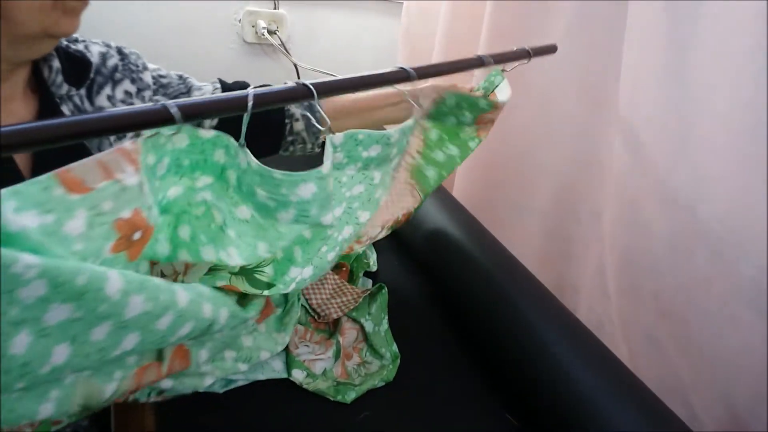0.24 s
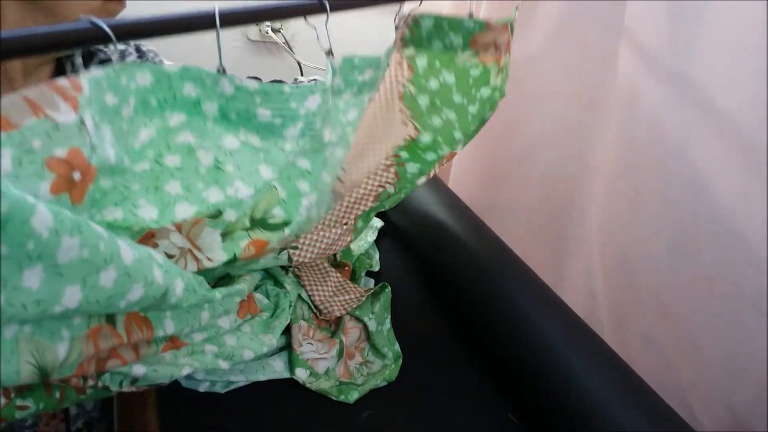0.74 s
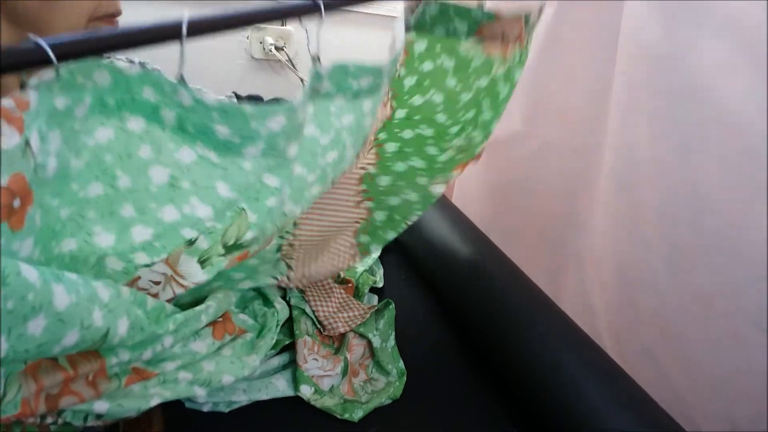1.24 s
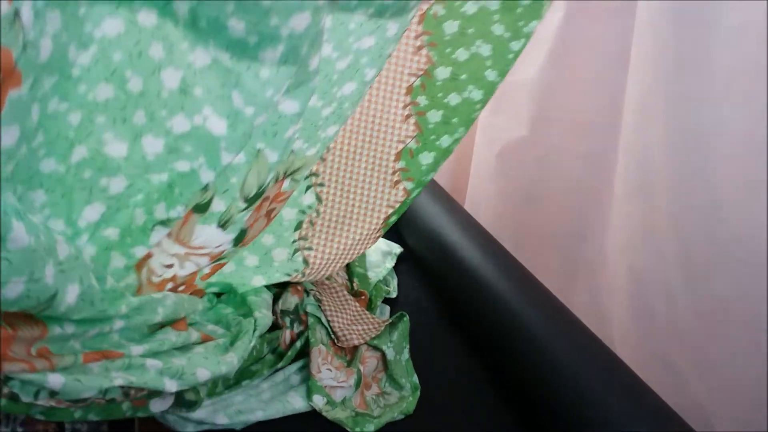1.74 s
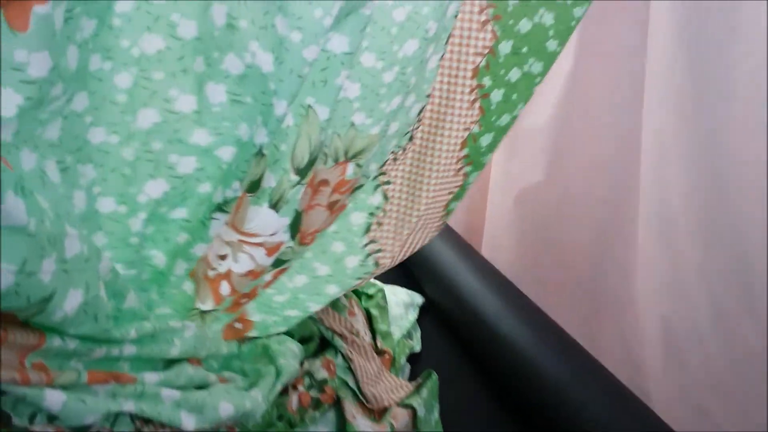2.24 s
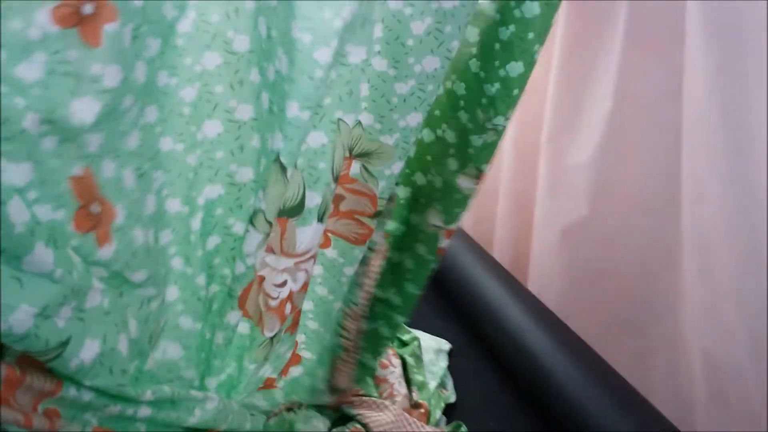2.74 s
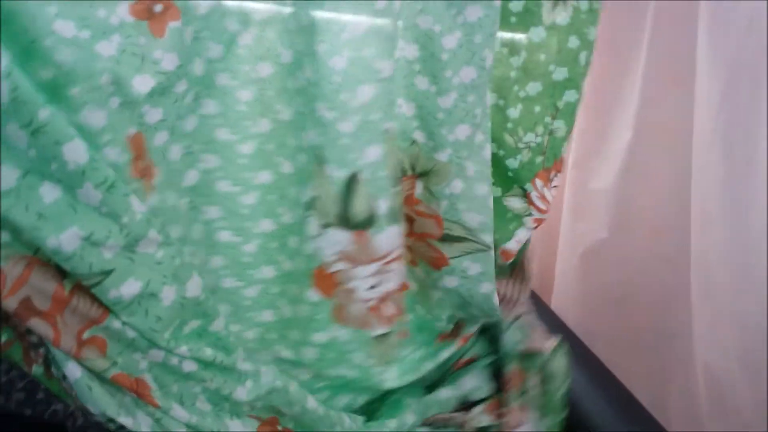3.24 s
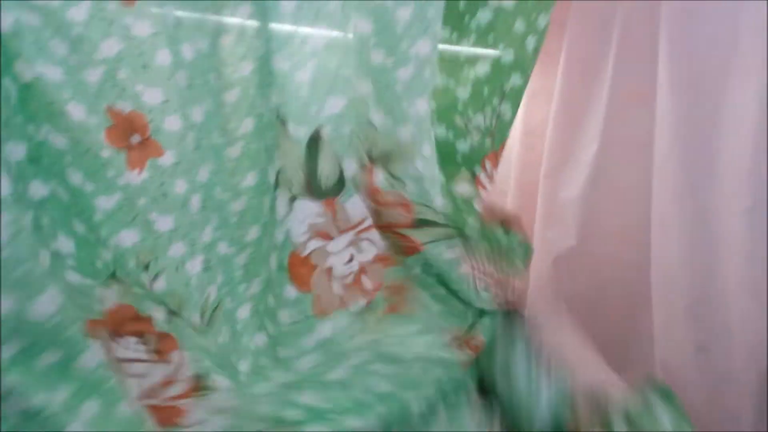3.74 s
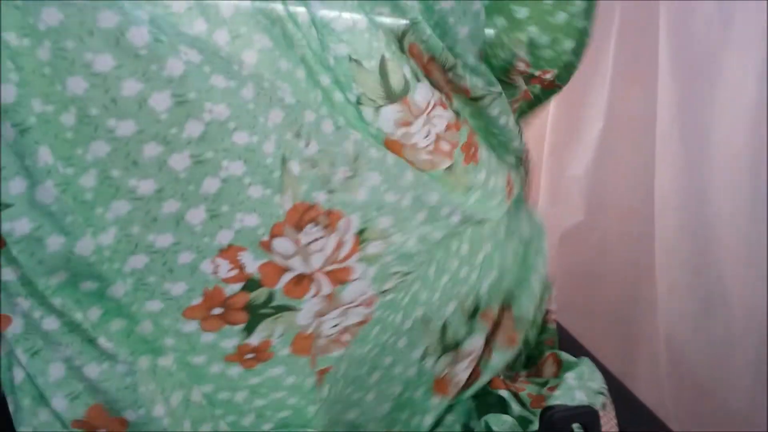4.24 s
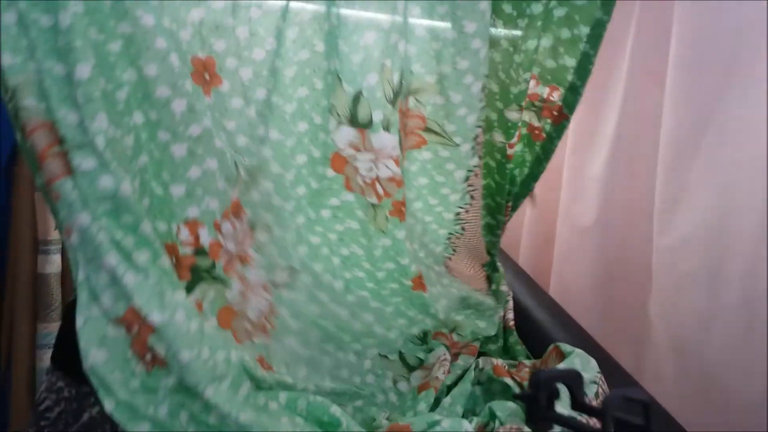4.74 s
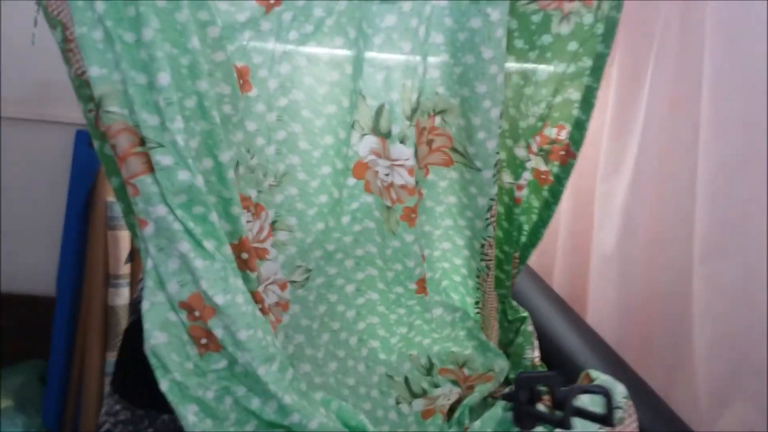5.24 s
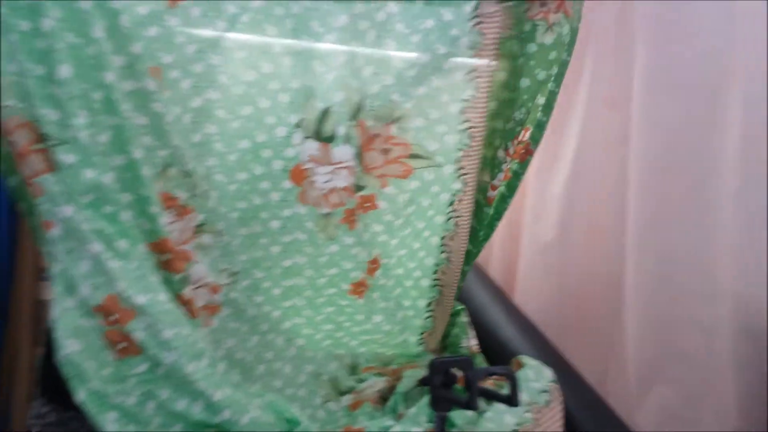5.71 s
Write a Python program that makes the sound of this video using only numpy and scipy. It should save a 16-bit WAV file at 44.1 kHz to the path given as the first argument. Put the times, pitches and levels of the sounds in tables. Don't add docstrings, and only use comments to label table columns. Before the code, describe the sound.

Small metal hooks scrape and clink sharply along a thin hollow rod, then cloth swishes and snaps softly over a faint room hum.

```python
import sys
import numpy as np
from scipy import signal
from scipy.fft import rfft, irfft, next_fast_len
from scipy.io import wavfile

SR = 44100
rng = np.random.default_rng(int(sys.argv[2]) if len(sys.argv) > 2 else 0)


def voltage_ratio(decibels):
    exponent = np.asarray(decibels, float) / 20
    return 10 ** exponent


def unload_wav(signal):
    wavfile.write(
        sys.argv[1],
        SR,
        np.round(np.clip(np.atleast_2d(signal).T, -1, 1) * 32767).astype(np.int16),
    )


N = 263532
T = np.arange(N) / SR
BLOW, TAIL = T[:6000], T[:12000]
FAMILIES = 4


def unit_rms(x):
    return x / np.sqrt(np.mean(x ** 2) + 1e-20)


def colour(x, points, power=1):
    f, db = np.transpose(points)
    size = next_fast_len(len(x), True)
    hz = np.fft.rfftfreq(size, 1 / SR)
    gain_db = power * np.interp(np.log(hz + 1), np.log(f + 1), db)
    return irfft(rfft(x, size) * voltage_ratio(gain_db), size)[:len(x)]


def band(x, lo_hz, hi_hz):
    return signal.sosfilt(signal.butter(3, [lo_hz, hi_hz], "band", fs=SR, output="sos"), x)


def ring(x, hz, width_hz):
    return signal.lfilter(*signal.iirpeak(hz, hz / width_hz, SR), x)


def wander(per_s):
    steps = rng.standard_normal(500)
    return np.interp(T * per_s, np.arange(len(steps)), steps) * np.sqrt(3 / 2)


def add(mix, start_s, sound):
    part = mix[..., round(start_s * SR):][..., :sound.shape[-1]]
    part += sound[..., :part.shape[-1]]


def follow(rows):
    s, db, tint_db = np.transpose(rows)
    t = np.arange(s[0], s[-1], 1 / SR)
    fade = np.clip(np.minimum(t - s[0], s[-1] - t) / 0.011, 0, 1)
    return t, np.interp(t, s, db), fade, np.interp(t, s, tint_db)


def slips(per_s, spread_db):
    size = voltage_ratio(spread_db * np.minimum(rng.exponential(1, N), 4)) * rng.choice([-1., 1.], N)
    return unit_rms(size * (rng.random(N) < per_s / SR))


def tone(rows):
    s, hz, db = np.transpose(rows)
    fade = np.clip(np.minimum(T - s[0], s[-1] - T) / 0.01, 0, 1)
    phase = 2 * np.pi * np.cumsum(np.interp(T, s, hz)) / SR
    return np.sqrt(2) * voltage_ratio(np.interp(T, s, db)) * fade * np.sin(phase)


def echoes(t60, after_s):
    tail = rng.standard_normal(len(TAIL)) * voltage_ratio(-60 * TAIL / t60) * (TAIL > after_s)
    return tail / np.linalg.norm(tail)


def rod(drag):
    # pitch_hz, width_hz, level_db
    modes = [
        [(2445, 40, -11), (2750, 50, -7), (2860, 45, -5), (3220, 45, 0), (3315, 35, 1), (3415, 25, 1),
         (3900, 70, -14), (9006, 16, -5), (9056, 22, -5)],
        [(1370, 50, -7), (1610, 130, -5), (2010, 80, -7), (2170, 90, -9)],
        [(4428, 45, -8), (5090, 70, -10), (5430, 160, -6), (5950, 70, -6), (6275, 70, -3), (6920, 90, -5),
         (7560, 45, -6)],
        [(9250, 250, -8), (10300, 150, -13), (10650, 150, -13), (11900, 200, -14), (12900, 300, -12)],
    ]
    # low_hz, high_hz
    spans = [
        (2400, 4000),
        (1000, 2400),
        (4000, 8400),
        (8400, 15000),
    ]
    scratches = [
        -1,
        -1,
        0.5,
        7.5,
    ]
    contact, rasp = slips(4500, 3.7), slips(12000, 2.3)
    efforts = drag * voltage_ratio(-2.5 + 1.75 * wander(60)) + blows()
    out = np.zeros(N)
    for effort, rings, (lo_hz, hi_hz), scratch_db in zip(efforts, modes, spans, scratches):
        sound, power = np.zeros(N), 0
        for hz, width_hz, db in rings:
            sound += voltage_ratio(db) * ring(contact * effort * voltage_ratio(2.7 * wander(27)), hz, width_hz)
            power += voltage_ratio(2 * db) * np.pi * width_hz / SR
        scratch = band(rasp * effort, lo_hz, hi_hz) / np.sqrt(2 * (hi_hz - lo_hz) / SR)
        both = sound / np.sqrt(power) + voltage_ratio(scratch_db) * scratch
        out += both / np.sqrt(1 + voltage_ratio(2 * scratch_db))
    return out


def drags():
    # time_s, drag_db, contact_brightness_db
    slides = [
        [(.05, -63, -29), (.15, -54.5, 4), (.22, -53.5, 1), (.29, -48, 2.5), (.38, -54.5, -1.5),
         (.47, -46.5, -1.5), (.55, -49.5, -0.5), (.61, -59.5, -2), (.9, -93, -7)],
        [(1.27, -77, 0), (1.33, -68.5, -3.5), (1.465, -65.5, -1), (1.6, -80.5, 4.5)],
        [(2.38, -86, 6), (2.444, -57.5, -0.5), (2.55, -52.5, -1.5), (2.64, -51.5, 3), (2.77, -47.5, -2),
         (2.89, -55.5, -3), (2.96, -52.5, -3), (3.08, -69, -17), (3.34, -68, 2)],
        [(3.9, -63, 0), (3.96, -64.5, -6), (4.08, -59, -4), (4.14, -77, 2), (4.2, -66, 3)],
        [(4.39, -63, -6), (4.458, -60, -5), (4.525, -78, 11), (4.592, -58.5, -11), (4.66, -70, -13)],
        [(5.452, -56, -3), (5.51, -54, -2.5), (5.575, -47, -1), (5.645, -49.5, -2), (5.7, -58, -4.5),
         (5.9, -62.5, -3.5), (5.98, -64, -5.5)],
    ]
    # slide_start_db, slide_end_db
    loads = [
        (-1, -7),
        (-7, -2),
        (3, -10.5),
        (-5.5, 1),
        (-7, 1),
        (-5.5, -8),
    ]
    out = np.zeros((FAMILIES, N))
    top_db = -1.5
    offset_db = np.array([[0], [0], [0], [top_db]])
    low_per_drag_db, usual_drag_db = -0.27, -55.5
    for (t, db, fade, bright_db), load_db in zip(map(follow, slides), loads):
        weight_db = np.interp(t, t[[0, -1]], load_db) + low_per_drag_db * (db - usual_drag_db)
        add(out, t[0], fade * voltage_ratio(db + offset_db) * families(weight_db, bright_db))
    return out


def blows():
    # start_s, peak_db, weight_db, brightness_db, t60_s
    clinks = [(.117, -58, -6, 8, .025), (0.1252, -32.5, -8.5, 3.5, 0.044), (0.1734, -42, -14, 0.5, 0.13),
              (.2907, -54, 10, -12, 0.076), (.3242, -41.5, -14, -3.5, 0.11),
              (0.4546, -34.5, -24, 7.5, 0.018), (0.601, -54, -17, 3.5, 0.041),
              (0.7639, -36.5, -11, -6.5, 0.039), (0.7818, -48.5, -26, 1.5, .028),
              (1.166, -53.5, 3.5, 5.5, 0.049), (1.3035, -55.5, -6, -8, .04), (1.989, -44, -14, -3, 0.062),
              (2.9322, -50, -4, 8.5, .037), (2.9411, -45.5, -9, 3.5, 0.059), (3.2288, -45.5, -4, -4, 0.044),
              (3.9161, -44.5, -9, 4, 0.026), (4.106, -54, -17, 1, .045), (4.4628, -42, -14, 0, 0.03),
              (5.461, -53, 1, 7, 0.026), (5.5237, -46.5, -22, 1.5, .04), (5.5864, -51, 0, 0, 0.057),
              (5.6155, -44, -14, 2, 0.06), (5.7498, -57, -15, -2, 0.021), (5.837, -51, -19, 7.5, 0.029)]
    push = np.zeros((FAMILIES, N))
    for s, db, weight_db, bright_db, t60 in clinks:
        tick = voltage_ratio(-9 - 60 * BLOW / 0.0042)
        rattle = voltage_ratio(-60 * BLOW / t60)
        shudder = voltage_ratio(-18.0 - 60 * BLOW / (2.65 * t60))
        rise = np.minimum(BLOW / 0.00055, 1)
        gains = voltage_ratio(db - 6.0) * families(weight_db, bright_db)[:, None]
        add(push, s, gains * (tick + rattle + shudder) * rise)
    return push


def families(weight_db, bright_db):
    high_db = 1.1 * bright_db
    top_db = 1.58 * bright_db + 2.43
    return voltage_ratio(np.array([0 * bright_db, weight_db, high_db, top_db]))


def pings():
    # start_s, peak_db, pitch_hz
    ticks = [
        (.1262, -25, 7200),
        (.4545, -21, 6280),
        (.7648, -44, 3000),
        (1.1664, -38, 10300),
        (1.9892, -40, 5000),
        (5.4612, -45, 9080),
        (5.8365, -35, 6900),
    ]
    # start_s, peak_db, pitch_hz
    glints = [
        (.1268, -19.5, 13050),
        (.1268, -26, 10940),
        (.4555, -32, 10600),
        (.601, -42.5, 5570),
        (1.166, -42.5, 7100),
        (2.933, -36, 9900),
        (4.108, -46.5, 5880),
        (5.617, -37, 7570),
        (5.837, -41.5, 7440),
        (5.837, -46, 12700),
    ]
    # start_s, peak_db, pitch_hz
    ringing = [(.128, -38, 1997), (.128, -38, 7500), (.128, -46, 1620), (.293, -40, 2860),
               (.293, -43, 6310), (.296, -43, 1590), (.327, -35, 2875), (.456, -41, 2860),
               (.765, -46, 2890), (1.168, -56, 2870), (1.991, -56, 2400), (1.993, -56, 4890),
               (3.92, -52, 3400), (4.108, -58, 3420), (4.466, -52, 3320), (5.463, -47.5, 3320),
               (5.838, -50, 6320), (5.85, -49.5, 3260)]
    # start_s, peak_db, pitch_hz
    lingers = [(.078, -54.5, 3420), (.135, -39.5, 3320), (.455, -43, 9050), (.456, -36, 7560),
               (.766, -66, 3330), (1.993, -61, 3410), (2.46, -51, 1600), (2.482, -51, 1371),
               (2.945, -57, 3210), (3.232, -62, 3400), (4.465, -62, 9230), (4.905, -62, 3420),
               (5.48, -56, 9000), (5.527, -50, 3400), (5.57, -47, 8950), (5.587, -46, 3305),
               (5.62, -41, 3220), (5.68, -55, 3340), (5.752, -58, 3200), (5.8, -61, 3410), (5.9, -56, 3266)]
    out = np.zeros(N)
    rise = np.minimum(TAIL / 0.00078, 1)
    for rows, t60 in [(ticks, 0.0074), (glints, 0.027), (ringing, 0.086), (lingers, 0.16)]:
        for s, db, hz in rows:
            add(out, s, voltage_ratio(db - 60 * TAIL / t60) * rise * np.sin(2 * np.pi * hz * TAIL))
    return out


def squeak():
    # time_s, pitch_hz, level_db
    path = [
        (0.98, 10060, -94),
        (0.998, 10181, -81),
        (1.068, 10340, -79),
        (1.132, 10169, -87),
        (1.144, 10100, -76),
        (1.16, 10300, -81),
    ]
    return tone(path)


def snaps():
    # start_s, peak_db, pitch_hz, decay_cycles
    pops = [
        (1.5202, -35.5, 2760, 1.1),
        (3.619, -38.5, 788, 1.6),
        (3.835, -45.5, 650, 4.3),
        (3.849, -57, 484, 2.7),
        (4.254, -42, 2030, 4.8),
        (4.264, -48, 1320, 5.8),
        (4.2748, -38, 1540, 3),
        (4.589, -40, 855, 1.6),
        (4.607, -38, 1530, 1.7),
    ]
    out = np.zeros(N)
    for s, db, hz, cycles in pops:
        add(out, s, -voltage_ratio(db + 2.5) * np.sin(2 * np.pi * hz * BLOW) * np.exp(-2 * BLOW * hz / cycles))
    return out


def cloth(drag):
    # time_s, effort_db, crispness_db
    handling = [(.8, -66, 0), (1.04, -71.5, -6), (1.22, -69.5, -4), (1.55, -68.5, -3), (1.9, -77.5, 7),
                (2.25, -74, -7), (2.4, -72, -5), (3.0, -65, 4), (3.1, -62.5, -2), (3.46, -61, -1),
                (3.56, -67.5, 0.5), (3.64, -64, -11), (3.79, -62.5, -4), (4.1, -61, -3), (4.5, -61.5, -2.5),
                (4.75, -68, -5.5), (5.07, -68, -2), (5.2, -72, -17)]
    # middle_s, length_s, level_db, crispness_db
    swishes = [
        (2.016, 0.47, -68, 0.5),
        (3.927, 0.27, -58, 0),
        (4.26, 0.2, -53.5, -10),
        (4.614, 0.21, -58, -0.5),
        (4.899, 0.18, -62, 5.5),
        (5.35, 0.26, -61, -7.5),
        (3.674, 0.15, -58.5, -4.5),
    ]
    rub = unit_rms(rng.standard_normal(N) + 0.46 * slips(1200, 2.6)) * voltage_ratio(1.2 * wander(40))
    tosses = []
    for s, length_s, db, crisp_db in swishes:
        end_db = db - 10
        tosses.append([(s - length_s / 2, end_db, crisp_db), (s, db, crisp_db),
                       (s + length_s / 2, end_db, crisp_db)])
    slow, quick = fizz([handling]), fizz(tosses)
    swish = np.zeros(N)
    for edges_hz, power in zip([(800, 3200), (3200, 9000), (9000, 17000)], slow + quick):
        swish += unit_rms(band(rub, *edges_hz)) * np.sqrt(power)
    flap = np.sqrt(voltage_ratio(2 * -66) + voltage_ratio(2 * -2) * slow[0] + (voltage_ratio(-15.5) * drag[0]) ** 2)
    return voltage_ratio(-2.6) * swish + voltage_ratio(-1.5) * unit_rms(band(rub, 122, 806)) * flap


def fizz(movements):
    power = np.zeros((3, N))
    for t, db, fade, crisp_db in map(follow, movements):
        tilt_db = np.array([0 * crisp_db, 0.84 * crisp_db - 0.9, crisp_db])
        add(power, t[0], (fade * voltage_ratio(db + tilt_db)) ** 2)
    return power


def background():
    # frequency_hz, density_db per Hz
    hiss_shape = [(15, -14), (45, -21.5), (65, -13), (100, -6.5), (217, -16.5), (560, -10.5), (754, -12.5),
                  (1330, -14), (4490, -32), (6740, -30), (9070, -32.5), (12500, -20.5), (16000, -25)]
    # time_s, pitch_hz, level_db
    hum = [(0.0, 120.4, -62), (0.1, 119, -68), (0.43, 120, -64), (0.66, 120.4, -66.5), (1.9, 120.9, -66.5),
           (2.2, 121.2, -66.5), (3.78, 120.7, -63), (5.84, 116.3, -62), (5.98, 125, -61.5)]
    # pitch_hz, level_db
    overtone = [
        (253.0, -72),
    ]
    hiss = voltage_ratio(-60.5 - 2.5) * unit_rms(colour(rng.standard_normal(N), hiss_shape))
    (hz, db), = overtone
    return hiss + tone(hum) + voltage_ratio(db) * unit_rms(ring(rng.standard_normal(N), hz, 21))


def scene():
    drag = drags()
    near = rod(drag) + pings() + snaps() + cloth(drag) + squeak()
    room = voltage_ratio(-10) * signal.oaconvolve(near, echoes(0.28, 0.0014))[:N]
    mid = near + room + background()
    return np.array([mid, mid])


def top_cut(x):
    return signal.sosfilt(signal.butter(12, 16830, fs=SR, output="sos"), x)


def record(dry):
    # frequency_hz, gain_db
    capsule = [(7500, 0), (8100, -3.5), (8700, -4.5), (8950, -1), (15000, -3.3)]
    # frequency_hz, gain_db
    edge = [(15820, 0), (15920, -70)]
    # frequency_hz, level_db
    scatter = [(1500, -40), (2400, -23), (3500, -20.5), (4900, -8), (6300, -13), (7500, -14), (8400, -29),
               (10000, -16), (12000, -26), (14000, -50)]
    # frequency_hz, difference_db
    lean = [(2000, 0), (2600, 0.5), (3400, -5), (4200, -3.5), (5500, -9), (6300, -6.5), (7300, -3.5),
            (8300, 0.5), (10200, 3.5), (12500, 1.5), (14000, 1)]
    mid = colour(dry[0], capsule + edge)
    apart = colour(signal.oaconvolve(mid, echoes(0.069, 0))[:N], scatter)
    left = colour(mid + apart, lean, 0.4)
    right = colour(mid - apart, lean, -0.64)
    return top_cut(np.array([left, right]))


dry = scene()
out = record(dry)
unload_wav(out)
```